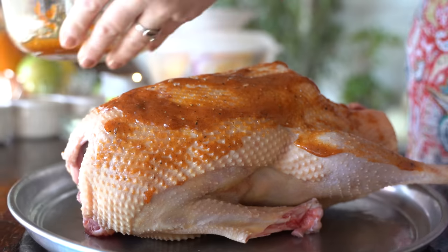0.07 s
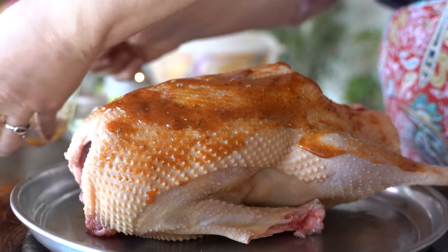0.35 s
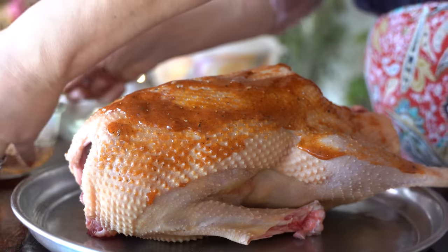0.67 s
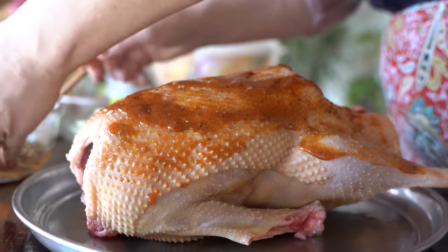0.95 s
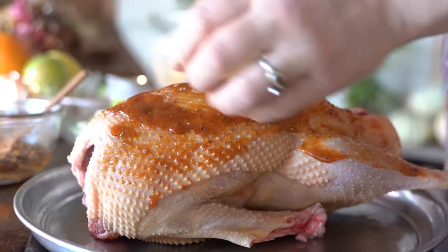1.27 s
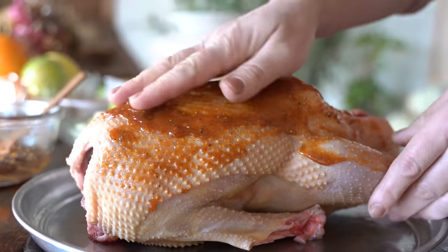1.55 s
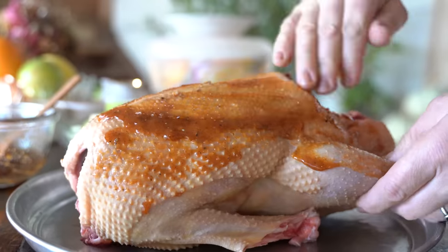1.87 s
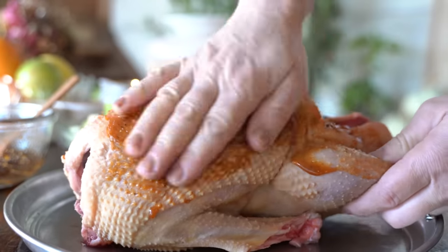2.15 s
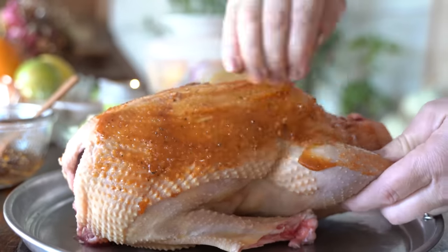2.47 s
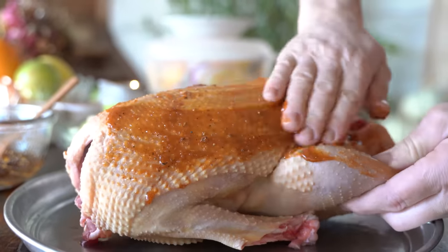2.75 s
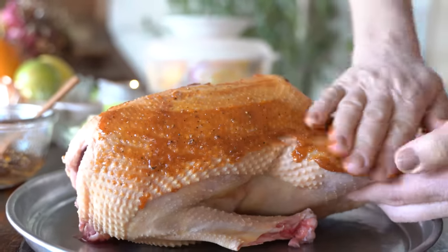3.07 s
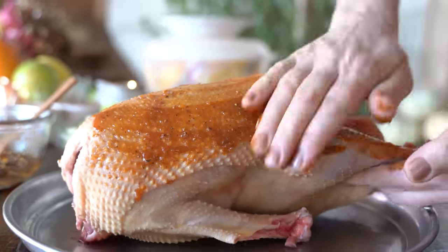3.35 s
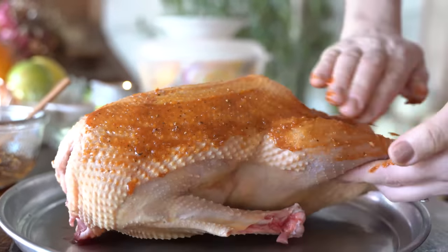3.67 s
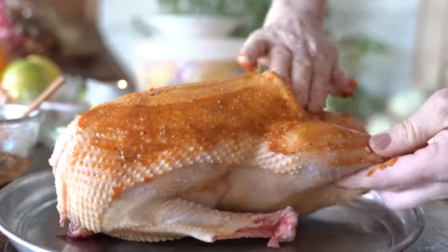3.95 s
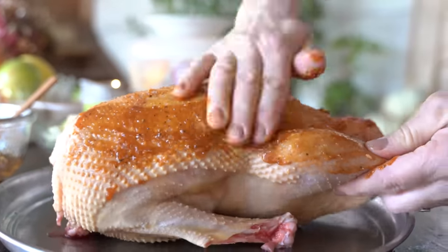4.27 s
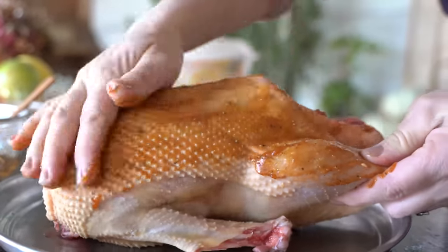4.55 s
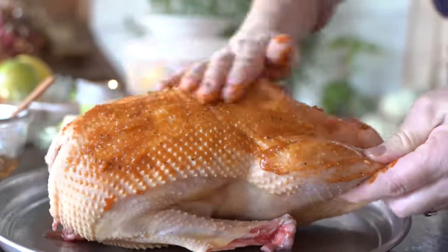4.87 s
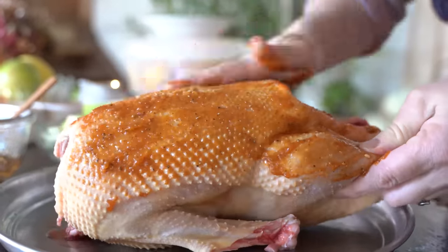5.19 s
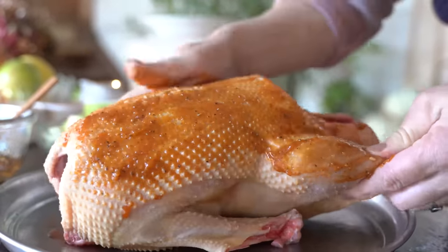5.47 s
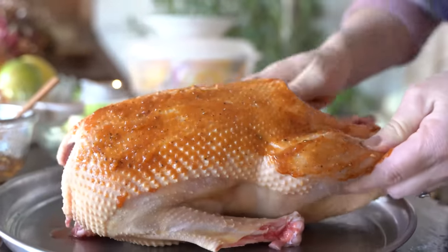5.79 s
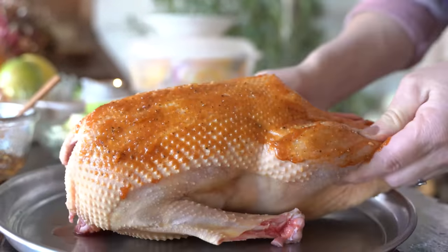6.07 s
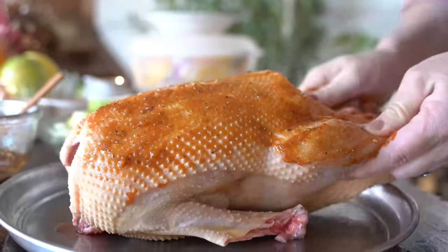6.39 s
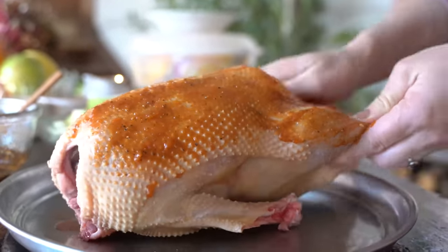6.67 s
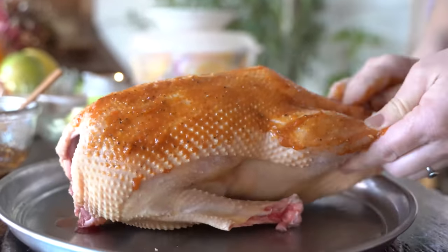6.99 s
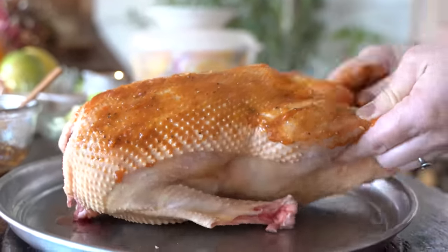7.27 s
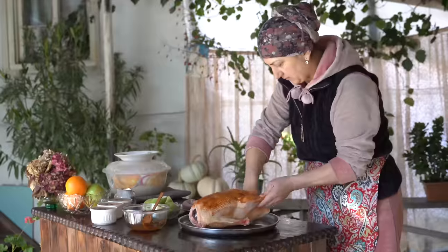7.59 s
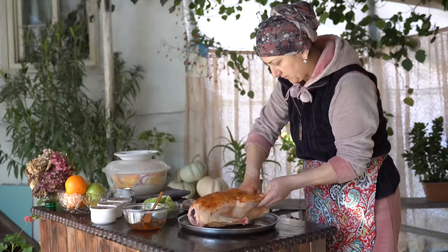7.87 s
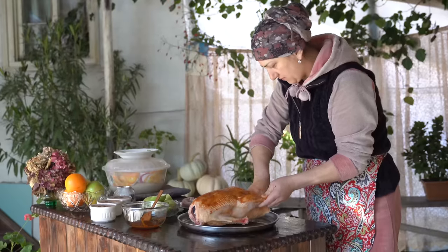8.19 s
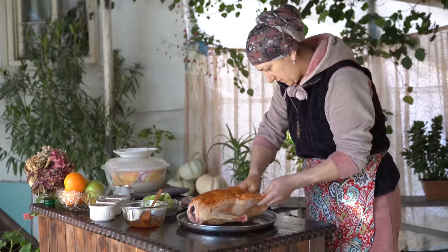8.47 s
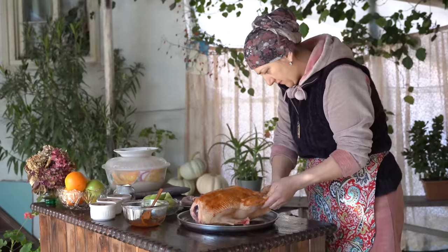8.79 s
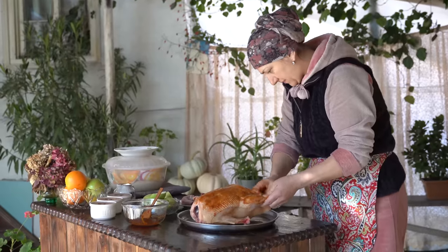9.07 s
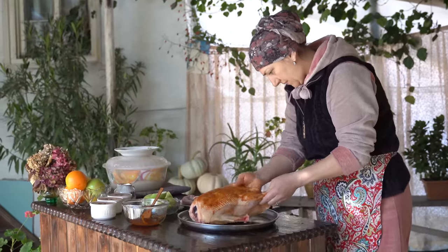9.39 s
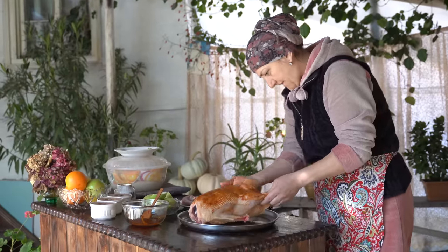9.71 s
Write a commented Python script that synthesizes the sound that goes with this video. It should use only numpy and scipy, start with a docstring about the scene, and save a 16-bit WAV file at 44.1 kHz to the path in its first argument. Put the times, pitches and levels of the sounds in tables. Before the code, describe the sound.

A faint, steady hush of a sheltered veranda lies under close, quiet kitchen handling. At about 0.7 seconds a glass bowl lands on a wooden table with a sharp knock, the loudest sound, and rocks with a low thump until 1 second. From about 1.2 seconds hands rub wet marinade over a raw duck in short, uneven strokes that fizz and crackle, dotted with sticky smacks and small squelches. Between 2.7 and 3.4 seconds the steel tray gives several light, bright ticks with a faint ring. Near 4.1 seconds come a soft wooden knock and a sharper metal clink. The smearing is wettest and busiest from 4.3 to 6 seconds, with a clear smack near 5.7. A soft bump follows around 7.3 seconds, then a faint brush of cloth. Lighter rubbing and scattered squelches continue until about 9.7 seconds.

```python
"""Hands rub a wet marinade over a raw duck on a steel tray, on a quiet sheltered veranda.
The palms smear the paste in strokes that fizz with tiny bursting films; wet skin smacks and trapped air
squelches out. The shifting bird makes the tray tick, knock and ring. Near the start a glass bowl is set
down on the wooden table and rocks. Now and then a sleeve or apron brushes past."""
import sys
import numpy as np
from scipy import signal
from scipy.io import wavfile

SR = 44100
rng = np.random.default_rng(int(sys.argv[2]) if len(sys.argv) > 2 else 0)


def output_pcm(signal):
    """Save a mono or channel-first signal as 16-bit PCM at the path in sys.argv[1].

    Samples are clipped to [-1, 1] before scaling.
    """
    pcm = np.clip(np.atleast_2d(signal).T, -1, 1) * 32767
    wavfile.write(sys.argv[1], SR, np.round(pcm).astype(np.int16))


N = 429534   # about 9.7 seconds
CUTOFF_HZ = 16000   # top of the treble


def from_db(db):
    """Turn decibels into a number to multiply a sound by."""
    return 10 ** (np.asarray(db) / 20)


def rms_one(x):
    """Scale a sound so that its average power is 1."""
    return x / np.sqrt(np.mean(x ** 2) + 1e-20)


def at_hz(points, hz):
    """Look up a table's value at a pitch, blending between its rows."""
    pitches, values = np.transpose(points)
    return np.interp(np.log(hz), np.log(pitches), values)


def add(out, start_s, sound):
    """Mix a sound into `out` at the given time."""
    i = max(round(start_s * SR), 0)
    out[:, i:i + sound.shape[-1]] += sound[..., :N - i]


def pan(db):
    """Left and right gains that make the left side `db` louder."""
    return from_db(np.array([[db], [-db]]) / 2)


def cut(x, hz, kind, order=2):
    """Keep the "low" part, the "high" part or a "band" of a sound."""
    sections = signal.butter(order, np.clip(hz, 10, .47 * SR), kind, fs=SR, output="sos")
    return signal.sosfilt(sections, x + 1e-18)


def ranges(x, splits_hz):
    """Split a sound into pitch ranges, low to high."""
    inner = [cut(x, band, "band", order=4) for band in zip(splits_hz, splits_hz[1:])]
    return [cut(x, splits_hz[0], "low", order=4), *inner, cut(x, splits_hz[-1], "high", order=4)]


def set_range_levels(sound, splits_hz, levels_db):
    """Give each pitch range of a hit its own level over the first 30 ms."""
    head = round(.03 * SR)
    return sum(from_db(db) * part / np.sqrt(np.mean(part[:, :head] ** 2))
               for part, db in zip(ranges(sound, splits_hz), levels_db))


def drift(per_s):
    """A wandering curve that heads for a new random value `per_s` times a second."""
    return np.interp(np.arange(N) * per_s / SR, np.arange(4096), rng.standard_normal(4096))


# How alike left and right are for nearby sounds (1 = the same): pitch_hz, likeness
NEAR_LIKENESS = [(100, 1), (400, 1), (1000, 0.81), (2500, 0.35), (7000, 0.37), (15000, 0.12)]
def shaped_noise(spectrum, n, likeness=NEAR_LIKENESS, envelope=lambda hz: 1):
    """Stereo noise built from half-octave bands, each with its own level and shape in time."""
    out, white = 0, rng.standard_normal((2, 2, n))
    edges_hz = 22 * 2 ** np.arange(0, 9.6, .5)
    for k, band in enumerate(zip(edges_hz, edges_hz[1:])):
        mid, side = cut(white[k % 2], band, "band")
        hz = np.sqrt(band[0] * band[1])
        alike = np.clip(at_hz(likeness, hz), -1, 1)
        stereo = np.sqrt(1 + alike) * mid + np.sqrt(1 - alike) * side * [[1], [-1]]
        out = out + from_db(at_hz(spectrum, hz)) * envelope(hz) * stereo
    return rms_one(out)


def ringing(notes, t, likeness=NEAR_LIKENESS, scatter_db=1):
    """A struck object's own notes: pure tones that each drop 60 dB in fade_s seconds."""
    out = 0
    for k, (hz, db, fade_s) in enumerate(notes):
        phase_gap = np.arccos(np.clip(at_hz(likeness, hz), -1, 1)) * rng.choice([-1, 1])
        stereo = np.sin(2 * np.pi * hz * t + phase_gap * np.array([[.5], [-.5]]))
        gain = from_db(db + rng.normal() * scatter_db - 60 * t / fade_s)
        out = out + (-1) ** k * gain * stereo
    return out


# How long the table and veranda take to die away: pitch_hz, fade_s
TAIL_FADES = [(150, 1), (400, 0.69), (900, 0.43), (2500, 0.31), (6000, 0.38), (15000, 0.17)]
def hit_noise(spectrum, t, crack_s, tail_db, likeness=NEAR_LIKENESS):
    """The noisy part of a hit: a short crack, then a tail that dies sooner in the treble."""
    def envelope(hz):
        return np.exp(-t / crack_s) + from_db(tail_db - 60 * t / at_hz(TAIL_FADES, hz))
    return shaped_noise(spectrum, len(t), likeness, envelope)


def with_echoes(x, echo_db, fade_s):
    """Add scattered echoes off the table top, wall and roof."""
    t = np.arange(SR // 2) / SR
    envelope = (from_db(-60 * t / fade_s) + 9.6 * np.exp(-t / 0.00047)) * (t > .001)
    echoes = cut(rng.standard_normal((2, len(t))) * envelope, 7300, "low", order=1)
    echoes /= np.sqrt(np.sum(echoes ** 2) / 2)
    return x + from_db(echo_db) * signal.fftconvolve(x, echoes, axes=1)[:, :x.shape[1]]


# The background hush, from bass to treble: pitch_hz, level_db
AIR_SPECTRUM = [(15, -57), (25, -27.5), (150, -11), (309, -3.5), (416, -3), (1160, 2.5), (1650, -5),
                (2110, -1.5), (10700, -9.5), (14800, -11), (16000, -18)]
# How alike its left and right sides are: pitch_hz, likeness
AIR_LIKENESS = [(60, 0.79), (200, 0.93), (500, -0.015), (1200, 0.13), (3000, -0.26), (15000, 0.026)]
def veranda_air():
    """The soft hush of the veranda, with a faint wavering tone in it."""
    hush = from_db(-61) * shaped_noise(AIR_SPECTRUM, N, AIR_LIKENESS)
    tone = from_db(-82.5) * rms_one(cut(rng.standard_normal(N), [847, 883], "band"))
    return hush + tone


# The sound of rubbing cloth: pitch_hz, level_db
CLOTH_SPECTRUM = [(200, -22), (500, -7), (750, 0), (1250, 0), (1800, -11), (4000, -24), (16000, -45)]
# A sleeve or apron brushes past: start_s, level_db, length_s
CLOTH_BRUSHES = [(0.03, -60.5, 0.24), (2.201, -55.5, 0.046), (2.249, -56, 0.087), (7.614, -53.5, 0.14),
                 (7.78, -64, 0.099)]
def cloth():
    """Cloth brushes past in a soft swell of noise."""
    out = np.zeros((2, N))
    for start_s, db, length_s in CLOTH_BRUSHES:
        progress = np.arange(round(length_s * SR)) / (length_s * SR)
        swell = np.sin(np.pi * progress ** .7)
        add(out, start_s, from_db(db) * shaped_noise(CLOTH_SPECTRUM, len(swell)) * swell)
    return out


# The noise of knocked wood: pitch_hz, level_db
WOOD_SPECTRUM = [(110, -46), (190, -13), (500, -12), (900, -8), (1500, -15.5), (2200, -30), (2900, -14),
                 (4400, -26.5), (8000, -30), (16000, -58)]
# The notes of the knocked table: pitch_hz, level_db, fade_s
TABLE_NOTES = [(154.5, -17.5, 0.47), (193.5, -13.5, .55), (323.7, -11.5, .42), (360.3, -22.5, 0.71),
               (480.5, -9, 0.29), (615, 4, 0.103), (676, 1, 0.14), (795, 0, .15), (880, 4.5, 0.11),
               (930, -3, .26), (1040, 8.5, 0.056), (1095, 0, 0.17), (1163, 2, 0.089), (1362, -3.5, 0.15),
               (2020, -9.5, 0.16), (2200, -8.5, 0.05)]
# Knocks on the table: start_s, level_db, rattle_db (compared with the knock)
TABLE_KNOCKS = [(0.431, -60, -1), (0.667, -20.5, -14), (0.74, -32, -11.5), (0.867, -44.5, -17),
                (0.884, -55, -1), (0.939, -59.5, -19), (4.0675, -40, 1), (7.328, -49.5, 4.5),
                (7.4175, -61.5, 5), (8.7847, -57, 2)]
def table_knocks():
    """The bowl lands and rocks on the wooden boards; later the tray bumps them."""
    out, t = np.zeros((2, N)), np.arange(SR) / SR
    click = 1. * (t == 0)
    thud = from_db(-2) * rms_one(cut(cut(click, 870, "low"), 620, "high"))
    for start_s, db, rattle_db in TABLE_KNOCKS:
        ring = from_db(4) * rms_one(ringing(TABLE_NOTES, t))
        crack = hit_noise(WOOD_SPECTRUM, t, crack_s=.004, tail_db=-17.5)
        knock = cut(thud + crack + ring, 120, "high", order=3)
        levels_db = db + np.array([-14, 0, rattle_db, -12 + 0.85 * rattle_db])   # bass to treble
        add(out, start_s, set_range_levels(knock, (450, 1600, 2550), levels_db))
    return out * pan(2.8)


# The deep notes of the table top: pitch_hz, level_db, fade_s
BOOM_NOTES = [(153, -16, .4), (198, -3, .42), (226, -1, .37), (325, -20, .55), (404, -14, .35),
              (493, 0, .22)]
# Bumps that set them going: start_s, level_db
TABLE_BOOMS = [(0.67, -48), (0.867, -39.5), (0.965, -67), (1.169, -67), (4.134, -69)]
def table_booms():
    """A bump shakes the whole table top, which gives a low boom."""
    out, t = np.zeros((2, N)), np.arange(SR) / SR
    rise = 1 - np.exp(-t / .004)
    for start_s, db in TABLE_BOOMS:
        add(out, start_s, from_db(db) * ringing(BOOM_NOTES, t) * rise)
    return out * pan(2.8)


# The notes of the glass bowl: pitch_hz, level_db, fade_s
GLASS_NOTES = [(2062, 0, .17), (2153, -4, .26), (2420, -7, .18), (4290, -10, .24), (6070, -14, .28),
               (11000, -22, .2)]
# The bowl's foot touches the table: start_s, level_db
BOWL_LANDINGS = [(0.668, -40), (0.741, -46.5), (0.876, -55)]
def bowl():
    """The glass bowl rings faintly each time its foot touches down."""
    out, t = np.zeros((2, N)), np.arange(SR // 2) / SR
    for start_s, db in BOWL_LANDINGS:
        add(out, start_s, from_db(db) * ringing(GLASS_NOTES, t))
    return out * pan(2.8)


# The noise of tapped steel: pitch_hz, level_db
STEEL_SPECTRUM = [(180, -26), (300, -11), (1500, -9), (2000, -17), (3500, 0), (4600, -7.5), (9000, 3.5),
                  (16000, -9)]
# The short notes of the tray's rim: pitch_hz, level_db, fade_s
RIM_NOTES = [(616, -12, 0.16), (1055, -20, 0.37), (1510, -4.5, 0.15), (2007, 6.5, 0.089),
             (2920, -11.5, 0.5), (3360, -5, 0.29), (3400, 8, 0.11), (3540, -3, 0.16), (3860, -21, .2),
             (4242, -24, .17), (4670, -23, 0.32), (6300, -17, 0.22), (7040, -9, 0.2), (7700, -3, .1),
             (7854, -10, .2), (8300, -3, .13), (8592, -9, .16), (8900, -1, 0.13), (9600, -6, 0.12),
             (10470, -20, .16), (13600, -15, .08)]
# How alike left and right are for a tap: pitch_hz, likeness
TAP_LIKENESS = [(300, 1), (1000, 0.71), (2200, 0.59), (3000, -0.093), (5000, -0.59), (8000, -0.29),
                (15000, -0.5)]
# A tap's seven pitch ranges, low to high: level_db
TAP_RANGES_DB = [-20.5, -11.5, -8, -1, -2.5, -10.5, -15.5]
# Taps on the rim: start_s, level_db, hardness_db (extra per range going up), dip_db (near 5 kHz),
# ring_db, tail_db, rise_s (a slow rise sounds like a scrape)
RIM_TAPS = [(2.7534, -41, -0.8, 1, -9, -19, 0.00019), (2.9167, -41, -0.6, 0.5, -7, -19, 0.00018),
            (3.1686, -39, 0.5, 1.5, -10, -18.5, 0.00012), (3.2876, -41, 1, -2, -19, -16.5, 0.00026),
            (3.358, -45, -3, 0, -4, -18, 0.015), (4.129, -26.5, 0.5, 14, -2.5, -17.5, 0.0005),
            (4.177, -52, -3.5, 8, 4, -18, 0.001)]
def tray_taps():
    """As the bird shifts, the steel rim gives short, bright taps that echo off the table top."""
    out, t = np.zeros((2, N)), np.arange(round(.8 * SR)) / SR
    splits_hz = (1400, 2500, 4050, 6700, 9600, 12700)
    steps = np.arange(7) - 3   # ranges, counted from the one at 5 kHz
    echo_s = .00248
    for start_s, db, hardness_db, dip_db, ring_db, tail_db, rise_s in RIM_TAPS:
        rise = 1 - np.exp(-t / rise_s)
        crack = rise * hit_noise(STEEL_SPECTRUM, t, 0.0038 + rise_s, tail_db, TAP_LIKENESS)
        echo = .5 * np.roll(crack, round(echo_s * SR), axis=1)
        levels_db = db + np.array(TAP_RANGES_DB) + hardness_db * steps - dip_db * (steps == 0)
        ring = from_db(db + ring_db) * rise * ringing(RIM_NOTES, t, TAP_LIKENESS, scatter_db=1.5)
        add(out, start_s, set_range_levels(crack + echo, splits_hz, levels_db) + ring)
    return out * pan(1.5)


# The longer notes of the whole tray: pitch_hz, level_db, fade_s
TRAY_NOTES = [(1055, -24, 1.4), (1505, -8, 0.83), (2018, 7, 0.61), (2460, -3, .25), (2923, -6.5, 0.63),
              (3400, -12, 0.45), (3860, -20, 0.18)]
# Shoves on the tray: start_s, level_db, hardness_db (extra per octave going up)
TRAY_SHOVES = [(1.63, -62, 2), (2.01, -63, 1), (2.082, -53, 2), (2.209, -62.5, 23), (3.291, -62, 25),
               (3.378, -48, -8), (4.13, -57, 0)]
def tray_ringing():
    """A shove sets the whole tray ringing; a harder contact favours the higher notes."""
    out, t = np.zeros((2, N)), np.arange(round(.8 * SR)) / SR
    rise = 1 - np.exp(-t / .004)
    for start_s, db, hardness_db in TRAY_SHOVES:
        notes = [(hz, note_db + hardness_db * np.log2(hz / 2000), fade_s)
                 for hz, note_db, fade_s in TRAY_NOTES]
        add(out, start_s, from_db(db) * ringing(notes, t) * rise)
    return out


# Paste squeezed between fingers and flesh: start_s, level_db, pitch_hz, length_s, width_octaves
PASTE_SQUEEZES = [(0.175, -57, 5400, 0.034, 0.98), (1.817, -54.5, 1780, 0.032, 1.6),
                  (3.14, -70, 493, 0.029, 1.4), (4.5, -50, 2040, 0.02, 0.38), (4.732, -49, 1250, 0.017, 2),
                  (4.977, -55, 660, 0.022, 2.1), (5.02, -51.5, 2600, 0.042, 0.57),
                  (5.652, -46.5, 1390, 0.013, 0.81), (5.446, -58, 1900, .013, 0.48),
                  (5.469, -58, 690, 0.02, 1), (5.983, -60.5, 745, 0.041, 2),
                  (6.064, -52.5, 575, 0.0065, 1.4), (6.122, -56.5, 2520, 0.013, 1),
                  (6.319, -61, 1690, 0.048, .9), (6.386, -60.5, 670, 0.031, 1.8),
                  (6.673, -45.5, 2840, 0.02, 1.65), (6.78, -54.5, 930, 0.025, 1.5),
                  (7.065, -52.5, 1370, 0.036, 1.3), (7.415, -42, 1840, 0.0028, 0.55),
                  (7.639, -55, 885, 0.051, 0.82), (7.692, -53.5, 3620, 0.045, 0.96),
                  (7.89, -51, 2970, 0.0093, 1.8), (8.54, -51.5, 3600, 0.023, 1.15),
                  (8.928, -55, 1710, 0.044, 0.65), (9.112, -53.5, 3380, 0.028, 2.4),
                  (9.203, -56.5, 1380, 0.018, 1.8), (9.243, -65, 2900, 0.065, 1.2),
                  (9.53, -58.5, 1130, 0.023, 0.33), (9.679, -62.5, 400, 0.015, 1.5)]
def squelches():
    """Trapped air bubbles out through the paste; the pitch sinks as the air pocket opens."""
    out = np.zeros((2, N))
    glide_octaves = -.2   # in each length_s
    for start_s, db, hz, length_s, width_octaves in PASTE_SQUEEZES:
        progress = np.arange(round(3 * length_s * SR)) / (length_s * SR)
        clicks = rng.standard_normal(2 * len(progress)) ** 3   # cubing makes noise spiky
        pocket = cut(clicks, hz * 2 ** (np.array([-.5, .5]) * width_octaves), "band")
        speed = 2 ** (glide_octaves * (progress - .5))
        sinking = np.interp(np.cumsum(speed), np.arange(len(pocket)), pocket)
        swell = (progress / .25) * np.exp(1 - progress / .25)
        add(out, start_s, from_db(db) * rms_one(sinking) * swell)
    return with_echoes(out, echo_db=-2.5, fade_s=0.15)


def snap(hz):
    """A film of paste snaps: one sharp click and a quick trail of smaller ones."""
    t = np.arange(SR // 4) / SR
    first_share, trail_s = .26, 0.0064
    clicks = rng.standard_normal((2, len(t))) ** 3 * np.exp(-t / trail_s)
    trail = with_echoes(clicks[0] + 0.97 * clicks[1] * [[1], [-1]], echo_db=-10.5, fade_s=0.41)
    sound = np.sqrt(first_share) * rms_one(1. * (t == 0)) + np.sqrt(1 - first_share) * rms_one(trail)
    sound = cut(sound, [hz / 1.77, min(hz * 1.77, CUTOFF_HZ)], "band", order=1)
    sound = cut(sound, 350, "high")
    return sound / np.sqrt(np.mean(sound[:, t < .03] ** 2))


# Wet skin pulls away from the hand: start_s, level_db, pitch_hz, left_over_right_db
SKIN_SMACKS = [(1.171, -70, 1220, -20), (1.631, -57.5, 2920, 2), (1.6607, -75, 8000, 0),
               (1.682, -70, 8000, 2), (1.758, -57, 4800, 1), (1.913, -53, 4550, 4), (2.177, -59.5, 6540, 2),
               (2.197, -55.5, 4500, 3), (2.2459, -68, 6900, -1), (2.2623, -50, 7500, 4),
               (2.4988, -43.5, 3660, 3.5), (2.653, -53.5, 5430, 2), (2.862, -55.5, 4500, -3),
               (2.965, -56, 12000, -8), (2.974, -56, 4000, 3), (3.237, -63, 12400, -7),
               (3.4556, -52, 6260, -1), (3.5638, -53, 11100, -1), (3.683, -57.5, 2370, 3),
               (3.8147, -57.5, 5530, -1), (4.035, -47.5, 3640, 1.5), (4.2905, -52.5, 10000, -3),
               (4.3332, -50.5, 5000, 2), (4.3425, -44.5, 12300, -1), (4.4667, -54, 10900, 6),
               (4.4984, -51, 7500, 2), (4.5124, -43.5, 6570, 1), (4.5235, -50, 9000, 1),
               (4.6034, -54, 11700, 3), (4.65, -61, 6000, 4), (4.786, -46, 10100, 2),
               (4.8174, -57, 8740, -5), (4.9759, -47.5, 2860, 0), (4.998, -50, 10100, 0),
               (5.0136, -49, 6760, 1), (5.031, -49, 7000, 6), (5.1835, -53, 11000, 6),
               (5.1925, -51, 9600, 1), (5.308, -50, 10800, 2), (5.355, -57, 6000, -1),
               (5.4195, -53.5, 9000, 0), (5.5313, -53.5, 8240, 3), (5.653, -38.5, 3970, 1),
               (6.0533, -58.5, 7000, -1), (6.181, -53.5, 7340, 1), (6.2284, -53, 3200, -2),
               (6.281, -58, 3440, 3), (6.479, -49, 9450, -4), (7.0088, -52, 6000, 2), (7.07, -62, 1800, -7),
               (7.416, -57.5, 1890, -4), (8.252, -61.5, 3020, -5), (8.935, -70, 1790, 2),
               (9.1138, -58, 3400, -7), (9.205, -64, 1600, -2)]
def smacks(fizz):
    """Skin smacks as the hand lifts; it also sticks and lets go at random, louder with more fizz."""
    out = np.zeros((2, N))
    for start_s, db, hz, side_db in SKIN_SMACKS:
        add(out, start_s, from_db(db) * snap(hz) * pan(side_db))
    from_s, until_s, sticks_per_s = 1.6, 9.7, 8
    count = round(sticks_per_s * (until_s - from_s))
    starts_s = rng.uniform(from_s, until_s, count)
    for start_s, (size, pitch, side) in zip(starts_s, rng.standard_normal((count, 3))):
        hz = min(6000 * 2 ** (pitch / 2), 13000)
        gain = from_db(-63.5 + 1.5 * size) * (fizz[int(start_s * SR)] / from_db(-64)) ** 0.66
        add(out, start_s, gain * snap(hz) * pan(2 * side))
    return out


# Light rubbing by the hand that stays on the bird: time_s, friction_db
LIGHT_RUB = [(0, -62.5), (.5, -78.5), (1.5, -73), (2.3, -68.5), (3.1, -65.5), (3.8, -69), (5.5, -72.5),
             (7.0, -67), (8.0, -73), (8.25, -68.5), (8.7, -67.5), (9.05, -73), (9.74, -75)]
# How wet that rubbing is: time_s, wetness_db (fizz compared with friction)
LIGHT_RUB_WETNESS = [(0, -3), (1.6, -1), (3.1, -0.5), (6.4, 7.5), (8.3, -7.5), (9.7, 5)]
# Strokes of the palm: start_s, length_s, friction_db, wetness_db
PALM_STROKES = [(1.157, 0.034, -53, -7), (1.302, 0.12, -59, -13), (1.617, 0.26, -56.5, 3),
                (1.815, 0.12, -51.5, -2), (2.049, 0.039, -64, 8), (2.205, 0.13, -59.5, 12.5),
                (2.231, 0.23, -67, 17), (2.674, 0.12, -69, 17), (2.78, 0.16, -64.5, 12),
                (3.148, 0.22, -67.5, 9), (3.468, 0.21, -69, 11.5), (3.856, 0.042, -63, 16.5),
                (3.962, 0.041, -74, 20), (4.214, 0.24, -58, -9), (4.434, 0.17, -59.5, 14.5),
                (4.647, 0.096, -63, 11), (4.693, 0.14, -59.5, 14), (4.893, 0.049, -60, 4.5),
                (4.95, 0.14, -57.5, 13), (5.16, 0.19, -63.5, 16), (5.424, 0.068, -65.5, 12.5),
                (5.483, 0.086, -59, 10.5), (5.676, 0.2, -61, 12.5), (6.076, 0.05, -74.5, 17),
                (6.25, 0.083, -63, 3), (6.546, 0.11, -64.5, 6), (6.672, 0.082, -74.5, 14),
                (6.813, 0.019, -47, 3.5), (6.92, 0.04, -71.5, 17), (7.06, 0.042, -66, 8),
                (7.2, 0.069, -69, -1), (7.294, 0.096, -59, 2.5), (7.758, 0.089, -60.5, -3),
                (9.184, 0.062, -62.5, 2)]
def hand_motion():
    """How strong the skin friction and wet fizz are over time, as the palm lands, slows and lifts."""
    clock, t = np.arange(N) / SR, np.arange(SR // 2) / SR
    land_s, slow_db_per_s, lift_s = 0.058, 25.5, 0.029
    light_db = np.interp(clock, *np.transpose(LIGHT_RUB))
    light_fizz_db = light_db + np.interp(clock, *np.transpose(LIGHT_RUB_WETNESS))
    power = from_db([light_db, light_fizz_db]) ** 2
    for start_s, length_s, db, wetness_db in PALM_STROKES:
        press = np.minimum(t / land_s, 1) * from_db(-slow_db_per_s * t)
        lift = np.exp(-np.maximum(t - length_s, 0) / lift_s)
        add(power, start_s, (from_db([[db], [db + wetness_db]]) * press * lift) ** 2)
    return np.sqrt(power)


# The sound of smeared paste, for both crackle and rubbing: pitch_hz, level_db
PASTE_SPECTRUM = [(100, -22), (300, -6), (500, 2.5), (1200, -15.5), (2100, 2), (3500, -15.5), (7000, 0.5),
                  (12000, -2), (16000, -7.5)]
def crackle(bursts_per_s, spread_db):
    """Countless tiny films of paste burst in clumps, each giving a very short tick."""
    out, clumps = np.zeros((2, N)), from_db(2.5 * drift(70))
    for hz in np.geomspace(1800, 14000, num=8):
        bursts = rng.random(N) < bursts_per_s / 8 * clumps / SR
        sizes = from_db(spread_db * np.minimum(rng.exponential(1, N), 4.5)) * rng.choice([-1, 1], N)
        ticks = cut(bursts * sizes, [hz / 1.7, hz * 1.7], "band", order=1)
        ticks *= from_db(at_hz(PASTE_SPECTRUM, hz) + 2 * drift(12))
        out += [ticks, np.roll(ticks, rng.integers(-1, 3))]
    return rms_one(with_echoes(out, echo_db=-4, fade_s=0.09))


def rubbing(friction, fizz):
    """The sliding palm: flesh rumbles low down, skin rubs in the middle and wet paste fizzes on top."""
    flesh = from_db(-66.5) * (friction / from_db(-60)) ** 0.83
    grip = drift(45)
    smear = shaped_noise(PASTE_SPECTRUM, N, envelope=lambda hz: from_db(.8 * grip + 1.5 * drift(40)))
    films = crackle(bursts_per_s=2200, spread_db=4.7)
    splits_hz, crackle_shares = (1400, 4500), (.1, .42, .6)   # crackle's part of each range's power
    layers = zip(ranges(smear, splits_hz), ranges(films, splits_hz), crackle_shares)
    out = 0
    for gain, (hiss, ticks, share) in zip((flesh, friction, fizz), layers):
        out = out + gain * (np.sqrt(1 - share) * rms_one(hiss) + np.sqrt(share) * rms_one(ticks))
    return out * pan(0.62)


def scene():
    """Mix the veranda's hush, the things on the table and the working hands."""
    air = veranda_air()
    friction, fizz = hand_motion()
    clatter = table_knocks() + table_booms() + bowl() + tray_taps() + tray_ringing()
    hands = squelches() + cloth() + rubbing(friction, fizz) + smacks(fizz)
    return air + clatter + hands


def record(dry):
    """Cut away the very highest treble with a steep filter."""
    return signal.sosfilt(signal.ellip(10, .2, 70, CUTOFF_HZ, fs=SR, output="sos"), dry)


dry = scene()
out = record(dry)
output_pcm(out)
```